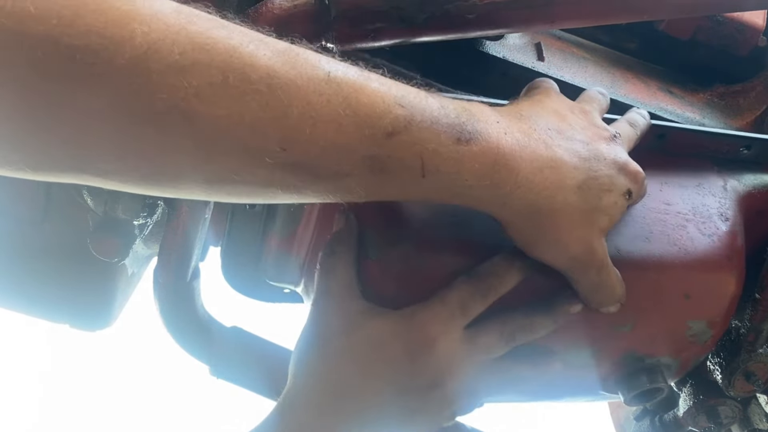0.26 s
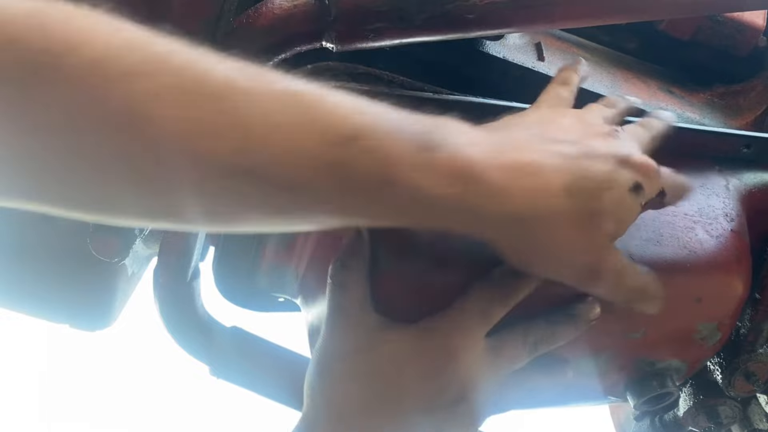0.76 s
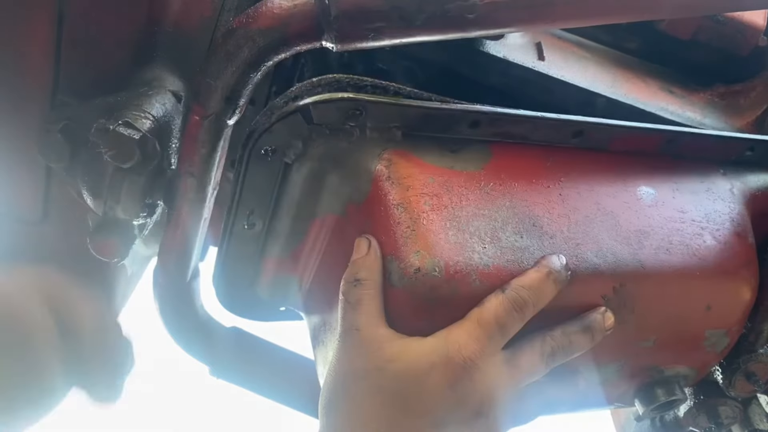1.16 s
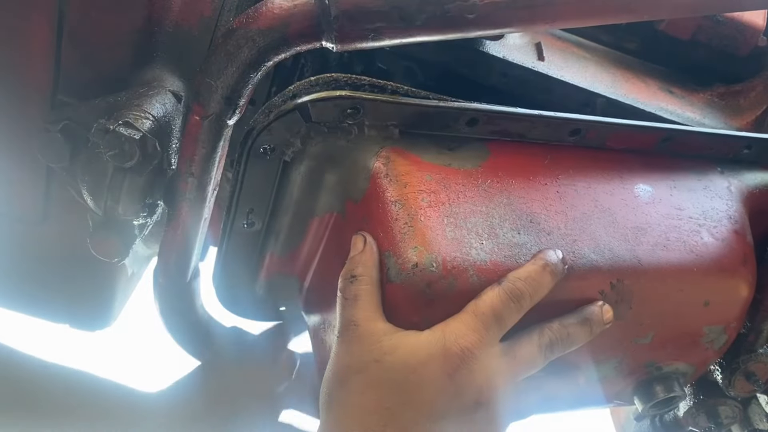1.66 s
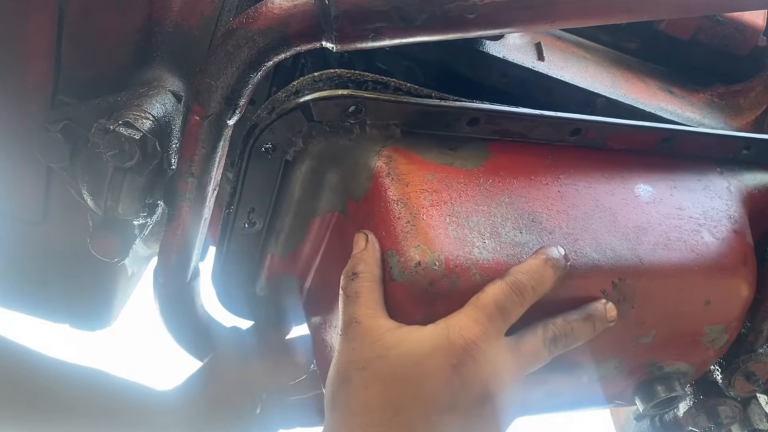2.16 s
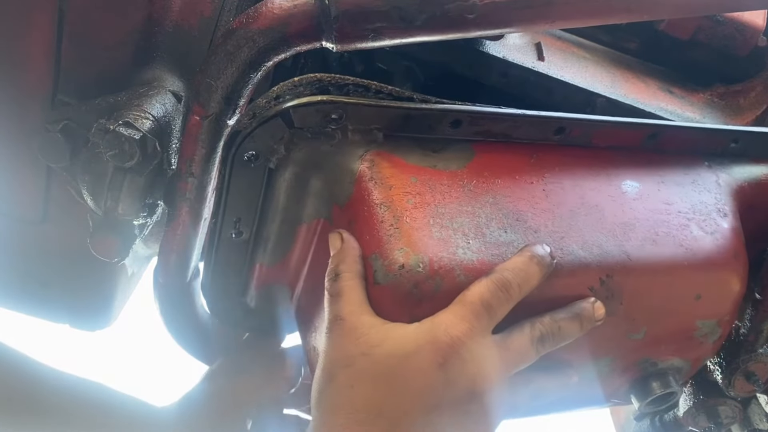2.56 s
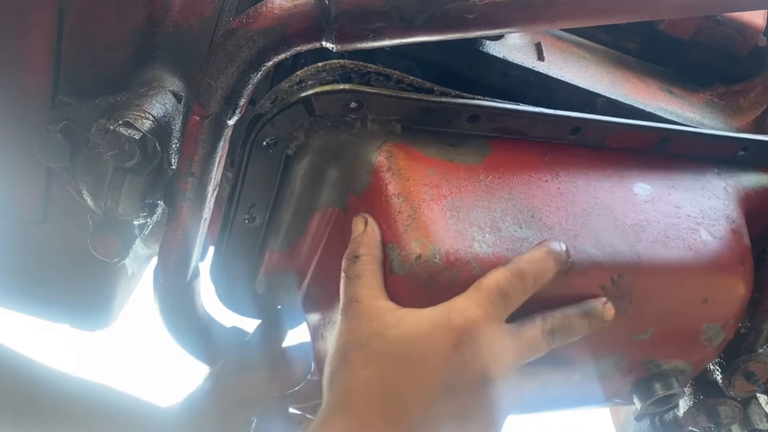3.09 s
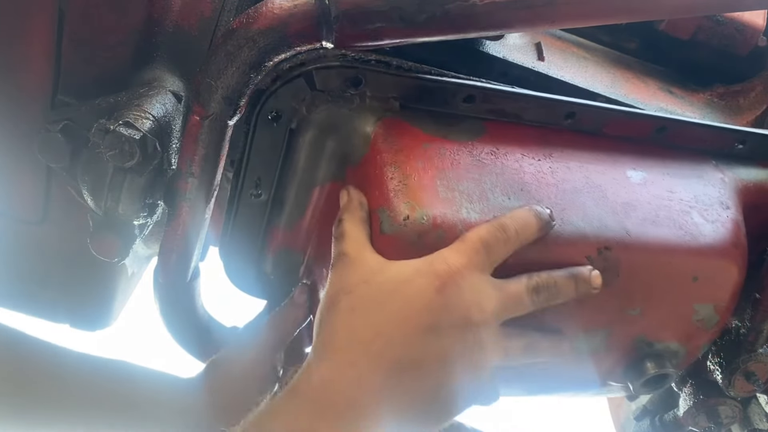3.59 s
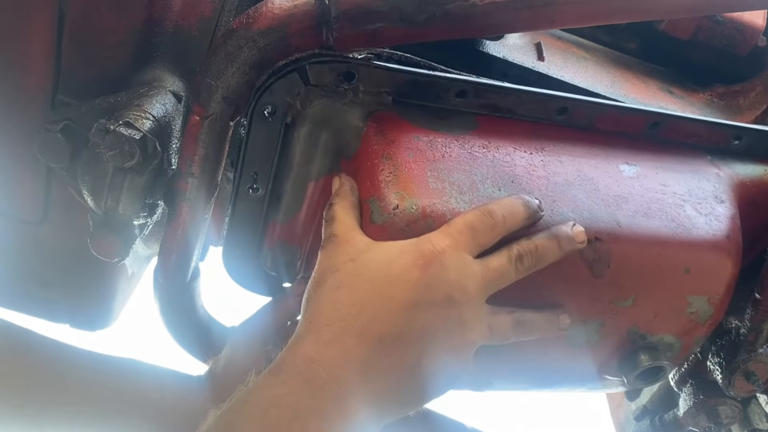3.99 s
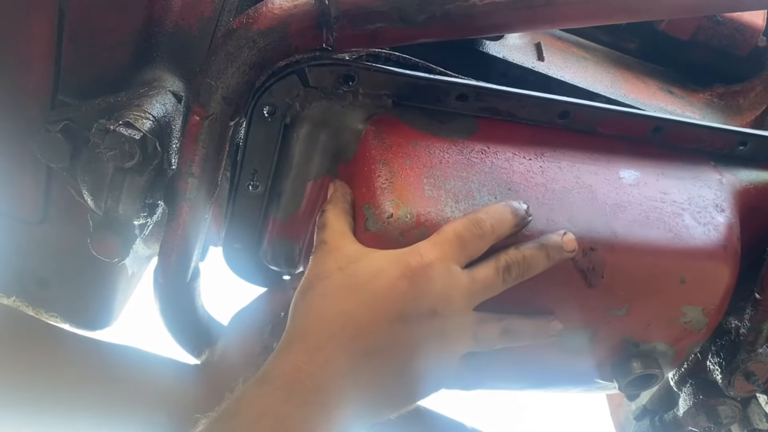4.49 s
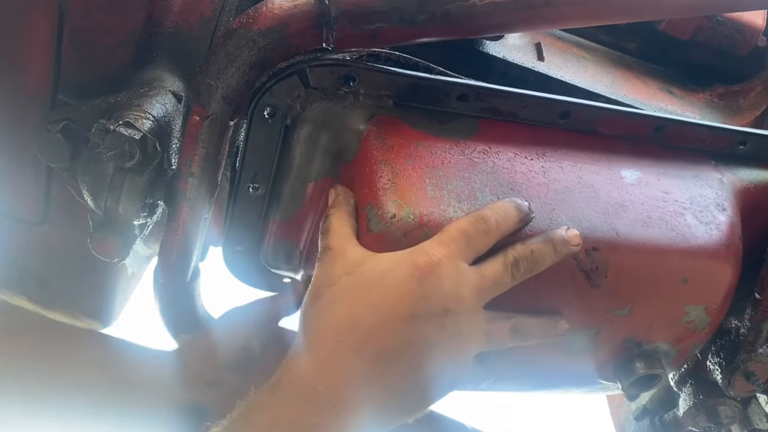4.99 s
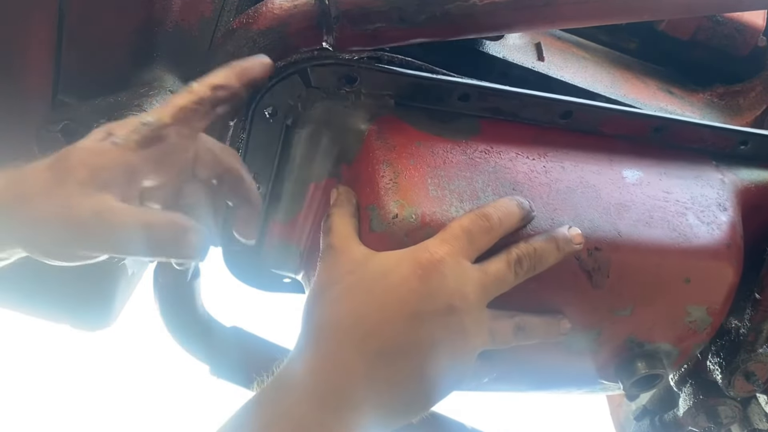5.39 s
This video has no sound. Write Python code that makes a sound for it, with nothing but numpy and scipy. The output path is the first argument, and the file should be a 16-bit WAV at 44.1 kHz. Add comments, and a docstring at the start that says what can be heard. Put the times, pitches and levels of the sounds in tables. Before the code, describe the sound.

Short, damped metal clanks and rasping scrapes as an oil pan is fitted by hand, with faint traffic behind.

```python
"""Outdoors by an engine, on two microphone ports a few centimetres apart, distant traffic throughout.
A heavy sheet-steel oil pan, damped by two hands, is lifted under the engine: knocks ring its modes.
After a quieter second of taps and short scrapes it is knocked into place, hardest near 2.4 s and 3.4 s,
with grit snapping between the steel faces. Lighter knocks and scrapes follow, and from 4.4 s a palm
rubs the hollow wall. Each port hears the pan with its own level and lag."""
import sys
import numpy as np
from scipy import signal
from scipy.fft import rfft, irfft
from scipy.io import wavfile

SR = 44100
rng = np.random.default_rng(int(sys.argv[2]) if len(sys.argv) > 2 else 0)


def waveform_to_disk(signal):
    """Save audio, clipped to [-1, 1], as 16-bit WAV at the path in sys.argv[1]."""
    frames = np.transpose(np.atleast_2d(signal))
    scaled = np.clip(frames, -1, 1) * 32767
    samples = np.round(scaled).astype(np.int16)
    wavfile.write(sys.argv[1], SR, samples)


N = 249165
HZ = np.maximum(np.arange(N // 2 + 1) * SR / N, 1)

# Distant traffic and air; levels in all tables are relative: (frequency [Hz], level [dB])
RUMBLE_SPECTRUM = [(24, -33), (40, -2), (102, -4), (130, -5.5), (183, -8), (273, -14.5), (308, -13.5),
                   (660, -37), (719, -32.5), (1110, -46.5), (2500, -52), (3250, -63.5), (5500, -120)]
# Stereo width of the rumble: (frequency [Hz], side above mid [dB])
RUMBLE_SIDE = [(60, -45.5), (110, -26), (190, -26), (350, -10.5), (630, 1.5), (1140, 4.5), (2050, -5),
               (3680, 23.5), (6630, 25), (11900, -14.5)]
# Rise and fall of the rumble: (time [s], level [dB])
RUMBLE_SWELL = [(0.0, -40), (0.1, -39.5), (0.3, -43.5), (0.82, -47), (2.12, -48), (2.5, -44), (2.74, -44),
                (3.16, -38.5), (3.38, -39), (3.76, -44), (4.17, -47), (4.88, -49), (5.18, -44),
                (5.65, -51.5)]
# Faint hiss: (frequency [Hz], level [dB])
HISS_SPECTRUM = [(1000, -12.5), (2000, -0.5), (5000, 6), (8000, 3.5), (12000, -1), (15000, -21)]
# A palm sliding over the hollow wall: (start [s], length [s], level [dB])
PALM_STROKES = [(4.395, .02, -58), (4.491, 0.049, -51.5), (4.726, 0.014, -52.5), (4.853, 0.03, -59),
                (4.994, 0.16, -55.5), (5.21, 0.018, -61), (5.283, 0.13, -68.5)]
# Resonances of that wall: (frequency [Hz], level [dB], t60 [s])
WALL_MODES = [(1130, 2, 0.064), (1139, 12, 0.064), (2090, 1.5, 0.1), (2180, -10, 0.041), (2780, -12, 0.019)]
# Grit snapping: (time [s], level [dB], decay [ms])
GRIT_SNAPS = [(0.1454, -51, 2.5), (0.278, -50, 1.8), (0.374, -32.5, 3), (0.772, -42, 3.3),
              (0.9135, -33, 10.3), (2.1293, -32, 4.6), (2.179, -42, 6.1), (2.403, -21, 2.5),
              (2.787, -28, 6.3), (3.071, -25.5, 2.7), (3.3878, -18.5, 2.6), (3.45, -21.5, 2.4),
              (3.578, -39.5, 2.2), (3.8374, -59, 2.1), (4.3154, -46, 2.2), (4.999, -56, 2.5),
              (5.1114, -35, 3), (5.2294, -48, 2.7)]
# Colour of a snap: (frequency [Hz], level [dB])
SNAP_SPECTRUM = [(1200, -28.5), (2500, 3), (3500, 1.5), (6000, -7.5), (10000, -10), (15000, -27)]
# Scrapes, the last three columns relative to the rasp:
# (start [s], length [s], rasp [dB], sag along the stroke [dB], pan [dB], flange [dB], sheen [dB])
SCRAPE_STROKES = [(0.005, 0.015, -49, 6.5, 19.5, 8.5, -8), (0.159, 0.12, -46, 3.5, 2.5, -1, -8),
                  (0.354, 0.025, -56.5, -7.5, -3, -9, -4.5), (0.381, 0.071, -51, -2, 6, 1, -9.5),
                  (0.444, 0.17, -58, 5, 18.5, 10.5, -9), (0.63, 0.14, -57.5, -2, 19, 11, -8.5),
                  (0.786, .11, -56, -2, 12.5, 1, -8.5), (0.915, 0.035, -58, 3.5, 16, -3, -7.5),
                  (0.977, 0.38, -69.5, 5, 0, -9, -3.5), (1.434, 0.017, -76, 1.5, 9, -15, 4),
                  (1.548, 0.022, -76, 3, 20, -12, -3), (1.719, 0.077, -67.5, 8, 10, -12, -7),
                  (1.858, 0.028, -62, 2.5, 6, 2.5, -9.5), (1.963, 0.11, -87, 0, 19, -2, 1.5),
                  (2.165, 0.047, -64.5, 1, 20.5, 0, -7), (2.259, 0.071, -70.5, 8.5, 16, -9, -4.5),
                  (2.36, 0.018, -64.5, -1.5, 11, -6, -8), (2.485, 0.098, -63.5, 7.5, 19, 10, -8.5),
                  (2.587, 0.022, -57.5, 4.5, 19.5, 7, -8.5), (2.64, 0.024, -80, 12, 27, 1, -11),
                  (2.74, .03, -67, -1, 14, 6, -8), (2.867, 0.029, -57, 4.5, 17, 4, -8),
                  (2.92, 0.067, -70.5, 5, 18.5, -2, -11), (3.015, .04, -67, -1, 8, -5, -9),
                  (3.222, 0.025, -59.5, 2.5, 17.5, 3, -11), (3.29, .05, -77.5, 1, 10, -4.5, -10),
                  (3.36, .015, -68, -3, 10, 1, -5), (3.411, 0.048, -47.5, 3, 9, 11.5, -7),
                  (3.472, 0.043, -37, 8.5, 15, 8, -12.5), (3.651, 0.086, -55, 2, 17.5, 0, -7),
                  (3.988, 0.073, -70, 3.5, 14, -14, -2), (4.113, 0.16, -70, -12, 5, -12, -6),
                  (4.317, .12, -54.5, 8.5, 8, -8, -7), (4.488, 0.069, -57, 8.5, 14.5, -6, -8.5),
                  (4.592, 0.076, -69.5, 6, 10.5, 3, -7.5), (4.723, 0.046, -64.5, 0.5, 10, 5, -10),
                  (4.819, 0.1, -68.5, 4.5, 14, 5.5, -7.5), (5.005, 0.093, -56, 3.5, 8.5, -8.5, -6),
                  (5.15, 0.083, -61, -5.5, 5, -1, -8.5), (5.288, .14, -64.5, 6, 7.5, -19, -7.5),
                  (5.45, .15, -76.5, 1.5, 8.5, -14, -5.5), (5.63, .01, -69, 2, -13, -14, -7)]
# Rasp of steel on steel: (frequency [Hz], level [dB])
RASP_SPECTRUM = [(300, -30), (700, -2.5), (1200, 2.5), (1600, -8.5), (2200, -5), (3500, -4), (5500, -5),
                 (7000, -10.5), (8500, -40)]
# Top octave of the rasp: (frequency [Hz], level [dB])
SHEEN_SPECTRUM = [(6000, -38), (7500, -5), (9000, -2), (12000, -5.5), (14000, -13), (16000, -18.5)]
# Knocks, thud to crack relative to the knock's level: (time [s], level [dB], thud [dB], sump [dB],
# walls [dB], floor [dB], flange [dB], crack [dB], contact [ms])
PAN_KNOCKS = [(0.01, -9.5, -40, -9.5, -14, -20, -27, -28, 10.8),
              (0.572, -13.5, -21, -25, -14, -14.5, -22.5, -21.5, 7),
              (0.594, -18.5, -12, -15, -18, -42, -5, -6, 6.1),
              (0.769, -20, -29, -24.5, -12.5, -11, -17, -16, 4.7),
              (0.926, -33.5, 8.5, -9.5, -14.5, -25, -36, -19, 9.5),
              (1.388, -44.5, 7.5, -4.5, -35, -33, -35, -41, 8.5),
              (1.7, -43, 0, -8, -15, -19, -37, -25.5, 9.5),
              (1.744, -31.5, -2, -26, -7.5, -13.5, -11, -18, 5.8),
              (1.842, -37, -16, -10, -11, -8, -39, -18, 8.5),
              (2.128, -31, -8, -19, -18.5, -17.5, -19, -8, 6.9),
              (2.185, -24.5, -0.5, -9.5, -23.5, -26.5, -50, -24, 2.65),
              (2.361, -47.5, -5.5, -12, 5, 1.5, -17, -10.5, 21),
              (2.399, -10.5, -40, -24, -18, -13, -7, -14, 11.2),
              (2.406, -6.5, -29.5, -53, -12, -8.5, -10.5, -13.5, 9.3),
              (2.508, -35.5, -14, -14.5, -9, -11, -23, -28.5, 8),
              (2.722, -36.5, -27.5, -18.5, -9.5, -22, -19.5, -13.5, 3.7),
              (2.771, -19, -23, -10, -18, -12, -21, -18.5, 2.5),
              (2.79, -20.5, 3, -24, -17.5, -10.5, -42, -18, 14),
              (3.07, -11.5, -32, -18, -13.5, -12.5, -9, -11, 5.2),
              (3.101, -12.5, -5, -3, -18, -13, -12, -15.5, 7.1),
              (3.121, -19.5, -10.5, -20.5, -13.5, -9.5, -40, -17, 2.6),
              (3.229, -31, 3.5, -6.5, -16, -13, -31, -19.5, 5.2),
              (3.386, -5.5, -41.5, -17, -14.5, -11.5, -7, -14.5, 11.9),
              (3.421, -10.5, -42.5, -23, -3.5, -25, -31, -17.5, 14),
              (3.446, -6.5, -36, -36, -24, -12, -15.5, -12, 4.3),
              (3.507, -22.5, -3.5, -9, -13, -23, -25, -22.5, 23),
              (3.675, -30, -16, -14, -3, -12, -6, -17, 28),
              (3.833, -28.5, -16, -33, -4, -14, -11.5, -24, 6.2),
              (4.242, -25.5, -32, -15, -11, -20, -27, -19, 6.8),
              (4.252, -23, -30, -10.5, -6, -42, -24, -24, 9.9),
              (4.313, -31, -35, -18, -13.5, -6, -27, -10, 17),
              (5.11, -25, -9, -5.5, -1, -25, -15, -9.5, 7.7),
              (5.127, -37.5, -36, -0.5, -1, -39, -37, -41, 38)]
# Crack of steel striking steel: (frequency [Hz], level [dB])
CRACK_SPECTRUM = [(300, -47), (1000, 4.5), (2200, 6.5), (4000, -6.5), (5500, -2), (7000, -24),
                  (10000, -24.5), (13000, -32), (16000, -49)]
# Modes of the hand-damped pan: (frequency [Hz], level [dB], t60 [s])
PAN_MODES = [(63.3, -7, 0.18), (100, -6, 0.2), (140.3, 1, 0.11), (189, -9, 0.32), (244.2, 4, 0.2),
             (285.5, -16.5, 0.32), (424.3, -8, 0.2), (460.6, 8, 0.068), (494.7, -0.5, 0.14),
             (556, -4, 0.062), (622, -4, 0.046), (741, -6.5, 0.13), (815, 2.5, 0.097), (894, -10, 0.11),
             (989, -4.5, 0.085), (1057, 2.5, 0.037), (1096, -6.5, 0.14), (1180.4, -3.5, 0.087),
             (1269, 9.5, 0.058), (1382, -6, 0.057), (1634, -11.5, 0.19), (1867, -12, 0.051),
             (2078, -2, 0.086), (2202, -4.5, 0.091), (2450, -11, 0.1), (2853, -4.5, 0.083),
             (3260, -9.5, .09), (3865, -7, 0.072), (4516, -10.5, 0.056), (5470, -24, 0.057)]
# Borders between the pan's six parts, thud to crack: (frequency [Hz])
PART_BORDERS_HZ = [150, 330, 640, 1020, 1500]
# How readily each part takes up a knock: (gain [dB])
PART_UPTAKE_DB = [-10.5, -4, -6.5, -7.5, -10, -17]
# How much each part faces the left port: (left above right [dB])
PART_FACING_DB = [0, 1, 3, 4, 0, 0]
# Chatter after a knock, relative to the parts struck: (rasp [dB], pan [dB], flange [dB], sheen [dB])
CHATTER_DB = [-21, -5, -10.5, -31]
# Balance between the microphone ports: (frequency [Hz], left above right [dB])
MIC_BALANCE = [(60, 0.0), (90, 0.0), (140, -0.5), (200, -0.5), (310, -0.5), (460, 4.0), (690, 5.0),
               (1040, 2.0), (1560, -0.5), (2340, -1.5), (3520, -0.5), (5290, 0.0), (7950, 0.0),
               (11900, 0.0)]
# Phase between the ports: (frequency [Hz], left lead [rad])
MIC_LEAD = [(0, 0), (780, -0.1), (1030, -1.0), (1550, -1.1), (1810, -0.2), (2760, 1.0), (3960, 0.3),
            (4480, 1.5), (5000, 0.1), (6980, 3.0), (8180, 3.6), (9730, 6.1), (10900, 6.4), (12100, 8.1)]

RISE_DB_PER_S, FADE_DB_PER_S = 801.5, 397.5   # how a stroke sets in and dies away
CHATTER_S, CHATTER_FADE_DB_PER_S = .0065, 451
MIC_TOP_LAG_S, CUTOFF_HZ = .00016, 15700


def amp(db):
    """dB to gain."""
    return 10 ** (np.asarray(db) / 20)


def rms_one(x):
    """Scale to rms 1."""
    return x / np.sqrt(np.mean(x ** 2) + 1e-20)


def at_hz(points):
    """A spectrum table read at every FFT bin."""
    hz, value = np.transpose(points)
    return np.interp(np.log(HZ), np.log(hz), value)


def colour(x, spectrum):
    """Filter with a spectrum of mean power 1."""
    return irfft(rfft(x) * rms_one(amp(at_hz(spectrum))), N)


def drift(rate_hz):
    """Slow random wander of rms 1."""
    r = np.exp(-2 * np.pi * rate_hz / SR)
    return rms_one(signal.lfilter([1], [1, -2 * r, r * r], rng.standard_normal(N + SR))[SR:])


def ring(force, hz, t60):
    """One mode: a unit click starts a decaying sine of height 1."""
    r, w = 1000 ** (-1 / (t60 * SR)), 2 * np.pi * hz / SR
    return signal.lfilter([0, np.sin(w)], [1, -2 * r * np.cos(w), r * r], force + 1e-18)


def contacts(times, level_db, lengths_s, rise):
    """Summed swell-and-fade envelopes, one per contact; rise is a fraction of the length."""
    out = np.zeros(N + SR)
    for start, gain, length in zip(times, amp(level_db), lengths_s):
        age = np.arange(int(8 * length * SR)) / SR / length
        out[round(start * SR):][:len(age)] += gain * (1 - np.exp(-age / rise)) * np.exp(-age)
    return out[:N]


def strokes(starts, lengths, level_db, sag_db=0, fade=FADE_DB_PER_S):
    """Attack, sagging hold and release in dB, one row per layer; strokes add in power."""
    level_db = np.atleast_2d(level_db)
    t = np.arange(N // 32 + 2) * 32 / SR
    power = np.full((len(level_db), len(t)), 1e-14)
    for (start, length, sag), db in zip(np.broadcast(starts, lengths, sag_db), level_db.T):
        loss_db = RISE_DB_PER_S * np.maximum(start - t, 0)
        loss_db += sag * np.clip((t - start) / length, 0, 1)
        loss_db += fade * np.maximum(t - start - length, 0)
        power += amp(db[:, None] - loss_db) ** 2
    return np.array([np.interp(np.arange(N) / SR, t, 10 * np.log10(row)) for row in power])


def surface_noise(own=.14):
    """White noise from a wide surface; each port hears the share `own` of its power alone."""
    return np.sqrt(1 - own) * rng.standard_normal(N) + np.sqrt(own) * rng.standard_normal((2, N))


def facing(hz):
    """Left and right gain of the part of the pan that rings at this pitch."""
    part = np.searchsorted(PART_BORDERS_HZ, hz)
    return amp(np.array([[.5], [-.5]]) * PART_FACING_DB[part])


def distant_traffic():
    """Far-off traffic and air: dark noise whose bass is nearly alike at both ports."""
    mid = colour(rng.standard_normal(N), RUMBLE_SPECTRUM)
    side = colour(rng.standard_normal(N), RUMBLE_SPECTRUM)
    side = irfft(rfft(side) * amp(at_hz(RUMBLE_SIDE)), N)
    swell_db = np.interp(np.arange(N) / SR, *np.transpose(RUMBLE_SWELL))
    return amp(swell_db - 1.5) * np.array([mid + side, mid - side])


def air_hiss():
    """A faint, wavering hiss behind the work."""
    return amp(-78.5 + 1.5 * drift(8)) * colour(surface_noise(own=.05), HISS_SPECTRUM)


def palm_rub():
    """Skin friction sounds the resonances of the pan's hollow wall."""
    start, length, level_db = np.transpose(PALM_STROKES)
    friction = surface_noise()
    wall = rms_one(sum(amp(db) * ring(friction, hz, t60) for hz, db, t60 in WALL_MODES))
    return amp(strokes(start, length, level_db)) * wall


def grit():
    """Grit breaks between the steel faces in very short, bright snaps."""
    times, level_db, decay_ms = np.transpose(GRIT_SNAPS)
    envelope = contacts(times, level_db - 7.5, decay_ms / 1000, rise=.05)
    return envelope * colour(surface_noise(), SNAP_SPECTRUM)


def chatter_levels():
    """The faces chatter on after each knock: rasp, pan, flange and sheen levels in dB."""
    times, level_db, _, _, walls, floor, flange, crack, contact_ms = np.transpose(PAN_KNOCKS)
    struck_db = level_db + [crack, np.maximum(walls, floor), flange, crack]
    chatter_db = struck_db + np.array(CHATTER_DB)[:, None]
    return strokes(times + contact_ms / 1000, CHATTER_S, chatter_db, fade=CHATTER_FADE_DB_PER_S)


def friction_levels():
    """Scrapes and chatter add in power: rasp, pan, flange and sheen levels in dB."""
    start, length, rasp_db, sag_db, *above_db = np.transpose(SCRAPE_STROKES)
    scraped_db = strokes(start, length, np.vstack([rasp_db, rasp_db + above_db]), sag_db)
    return 10 * np.log10(amp(scraped_db) ** 2 + amp(chatter_levels()) ** 2)


def pan_scrapes():
    """Steel slides in dense, uneven slips with scattered catches, rasping and feeding the pan's modes."""
    rasp_db, pan_db, flange_db, sheen_db = friction_levels()
    catches = (rng.random(N) < 250 / SR) * rng.exponential(.35, N)   # about 250 a second
    grip = amp(1.6 * drift(30)) * (1 + signal.lfilter([1], [1, -.97], catches))
    slips = rms_one(surface_noise() * grip)
    # the contact patch wanders, so the many short high modes take turns
    patch = sum(amp(5 * drift(5)) * ring(slips, hz * rng.uniform(.97, 1.03), t60=.03)
                for hz in np.geomspace(1900, 6900, 20))
    out = amp(rasp_db + 1.5) * colour(slips, RASP_SPECTRUM)
    out += amp(rasp_db - 1.5) * rms_one(patch)
    out += amp(sheen_db + 2.5) * colour(slips, SHEEN_SPECTRUM)
    for level_db, feed, low_hz, high_hz, t60_scale in [
            (pan_db - 6, slips[0], 150, 1020, .6),   # the low modes move as one
            (flange_db - 3, slips, 1020, 6000, .5)]:
        ringing = sum(facing(hz) * amp(db) * ring(feed, hz, t60_scale * t60)
                      for hz, db, t60 in PAN_MODES if low_hz < hz < high_hz)
        out += amp(level_db) * rms_one(ringing)
    return out


def pan_knocks():
    """The metal chatters through each contact: a crack, and a force that rings the modes part by part."""
    times, level_db, *part_db, crack_db, contact_ms = np.transpose(PAN_KNOCKS)
    part_db.append(crack_db)   # the crack column also drives the highest modes
    contact_s = contact_ms / 1000
    push_db = level_db - 20 * np.log10(contact_s * SR)   # a longer contact spreads the blow
    wander = [drift(67) for _ in part_db]
    out = np.zeros((2, N))
    for hz, mode_db, t60 in PAN_MODES:
        part = np.searchsorted(PART_BORDERS_HZ, hz)
        spot_db = rng.normal(0, 1 + .5 * part, len(times))   # each knock lands on another spot
        push = contacts(times, push_db + spot_db + part_db[part], contact_s, rise=.15)
        # many tiny touches in step with the mode, their timing wandering
        phase = 2 * np.pi * hz * np.arange(N) / SR + rng.uniform(0, 2 * np.pi) + .9 * wander[part]
        force = push * (np.cos(phase) + 1.8 * rng.standard_normal(N))
        out += facing(hz) * amp(mode_db + PART_UPTAKE_DB[part] + 14) * ring(force, hz, t60)
    crack = contacts(times, level_db + crack_db - 4.5, 1.21 * contact_s + .00095, rise=.038)
    return out + crack * colour(surface_noise(), CRACK_SPECTRUM)


def microphone_ports(x, scatter_db, scatter_t60):
    """Each port has its own level and lag, and its own short scatter off the nearby steel."""
    top_hz = MIC_LEAD[-1][0]
    lead = np.interp(HZ, *np.transpose(MIC_LEAD))
    lead += 2 * np.pi * MIC_TOP_LAG_S * np.maximum(HZ - top_hz, 0)   # keeps growing above the table
    left = amp(at_hz(MIC_BALANCE) / 2) * np.exp(.5j * lead)
    t = np.arange(SR // 10) / SR
    echoes = rng.standard_normal((2, len(t))) * 1000 ** (-t / scatter_t60)
    echoes *= amp(scatter_db) / np.sqrt(np.sum(echoes ** 2, axis=1, keepdims=True))
    scatter = rfft(echoes, N) * HZ ** 2 / (HZ ** 2 + 500 ** 2)   # long waves reach both ports alike
    return irfft(rfft(x) * (np.array([left, 1 / left]) + scatter), N)


def scene():
    """At the microphone: pan and faint hiss through the ports, traffic in the distance."""
    hiss = air_hiss()
    pan = pan_knocks() + grit() + pan_scrapes() + palm_rub()
    return microphone_ports(pan + hiss, scatter_db=-18, scatter_t60=.099) + distant_traffic()


def record(dry):
    """The recorder rolls off the bass below 50 Hz and cuts the top steeply."""
    low_cut = signal.butter(5, 50, "high", fs=SR, output="sos")
    high_cut = signal.ellip(10, .5, 70, CUTOFF_HZ, fs=SR, output="sos")
    return signal.sosfilt(high_cut, signal.sosfilt(low_cut, dry))


dry = scene()
out = record(dry)
waveform_to_disk(out)
```